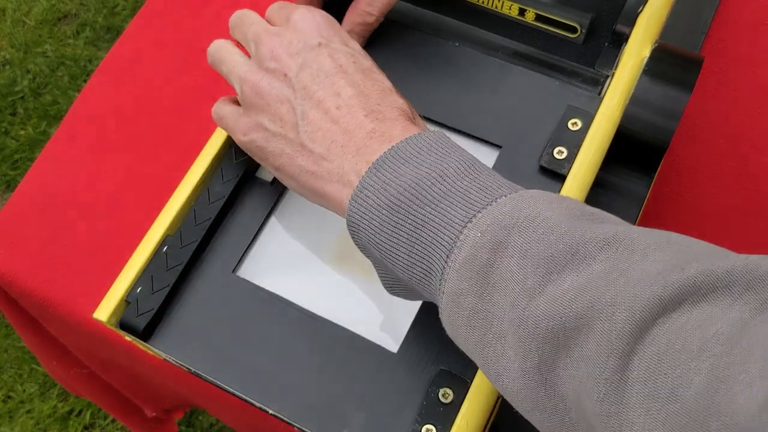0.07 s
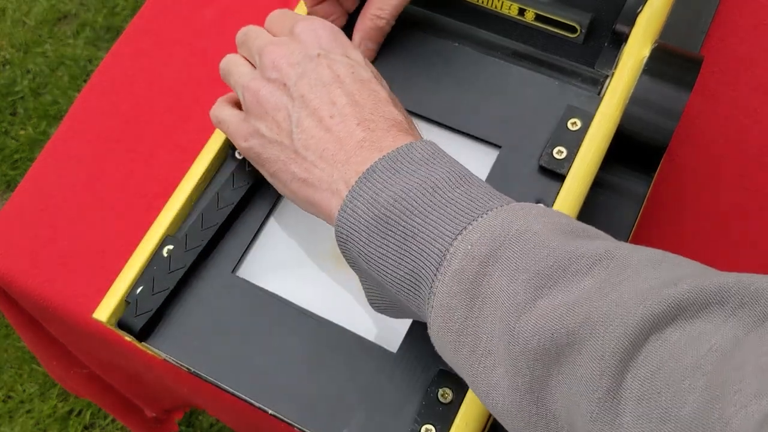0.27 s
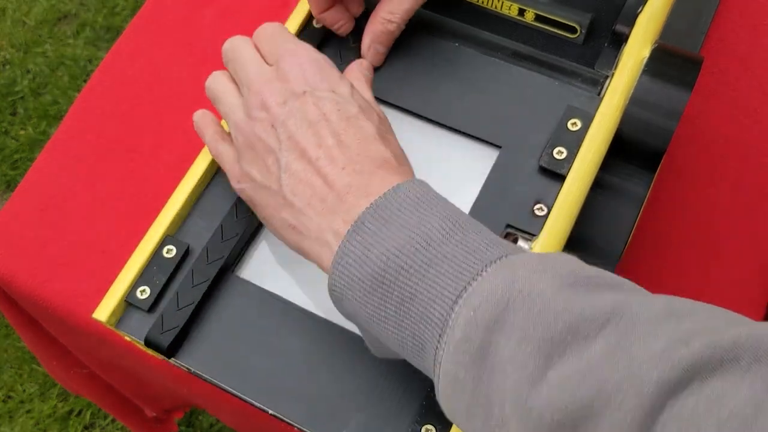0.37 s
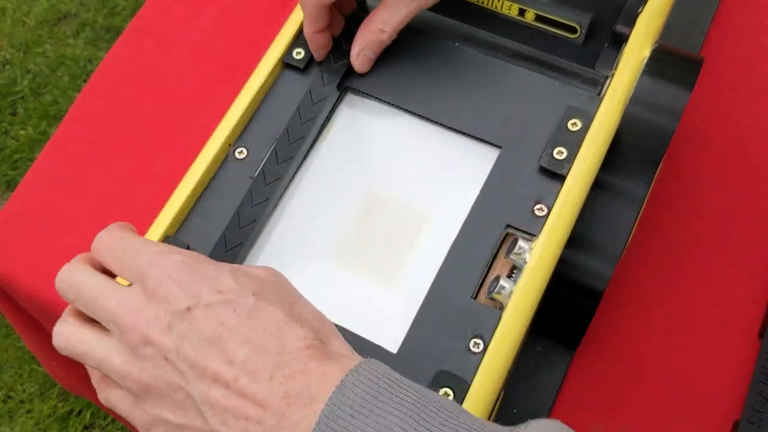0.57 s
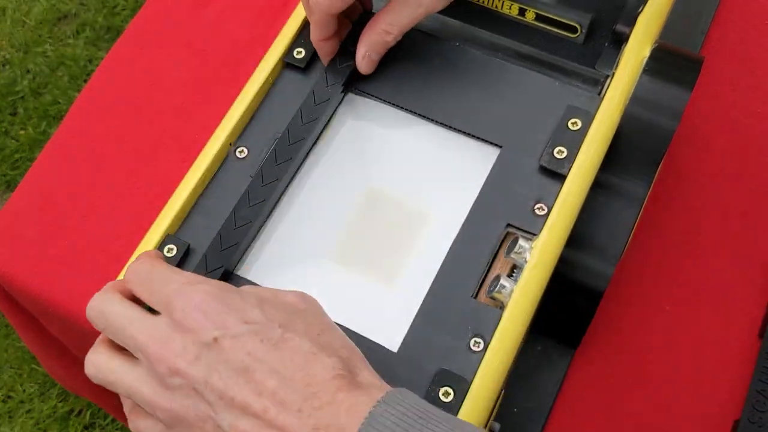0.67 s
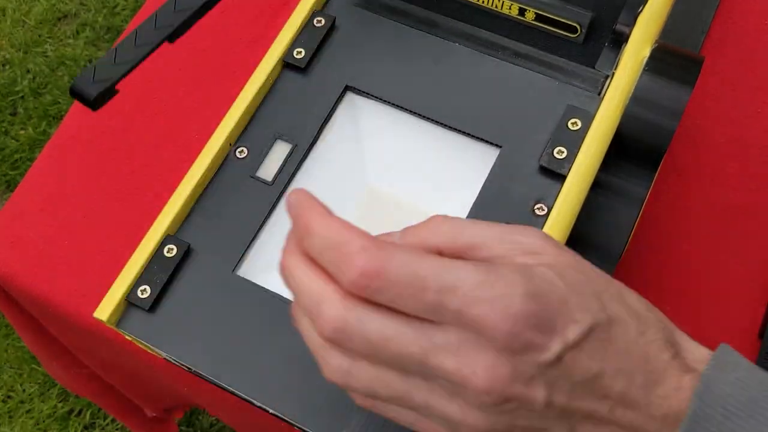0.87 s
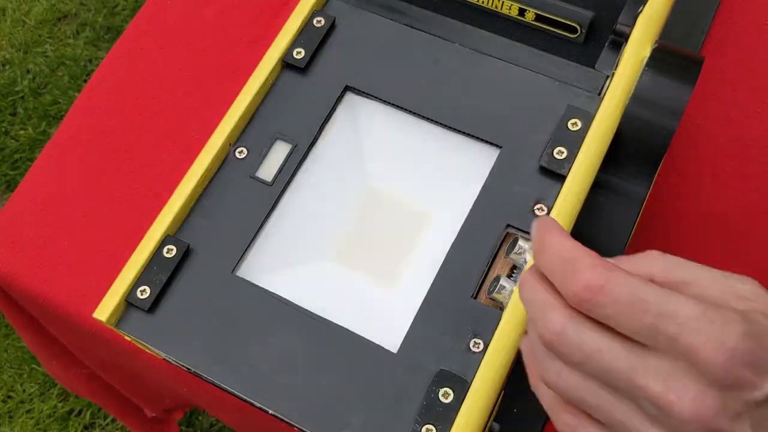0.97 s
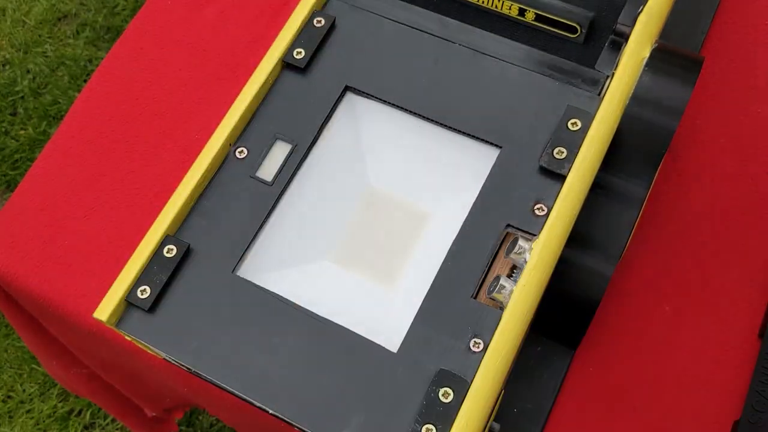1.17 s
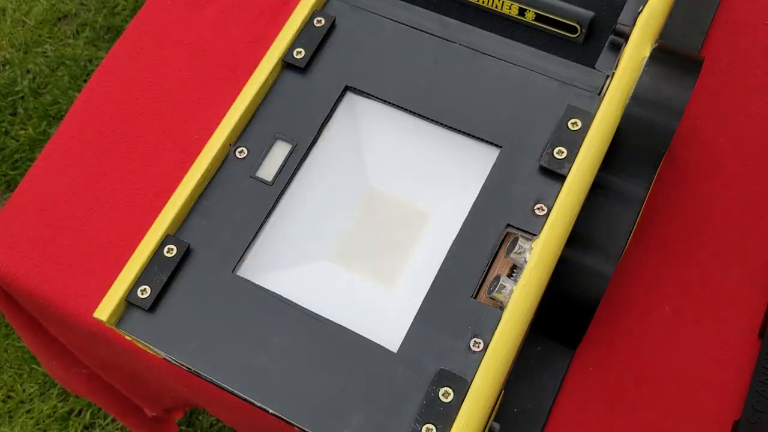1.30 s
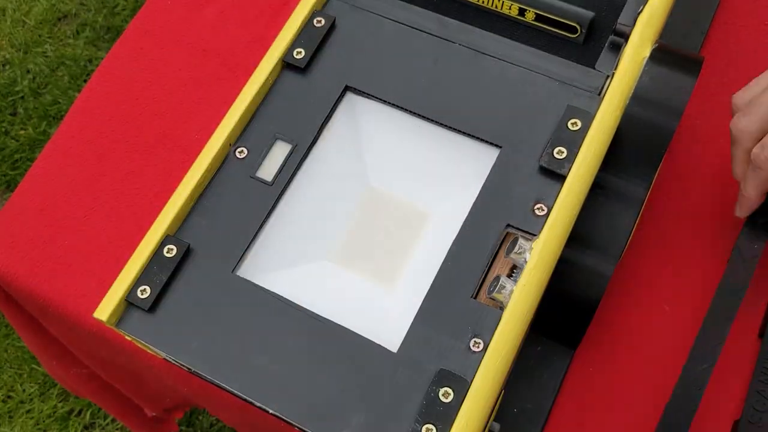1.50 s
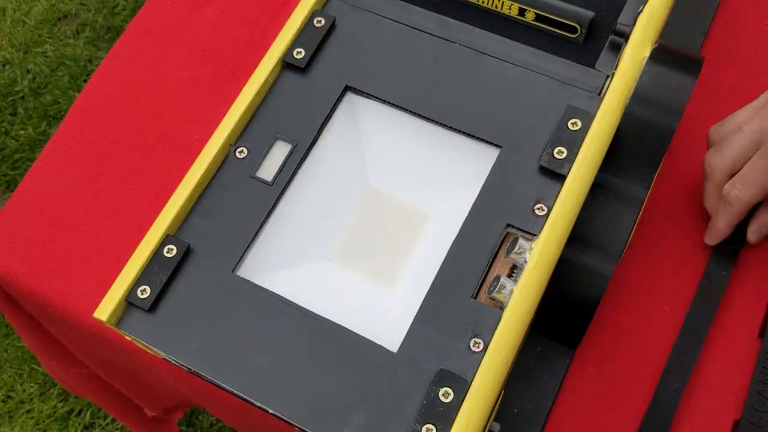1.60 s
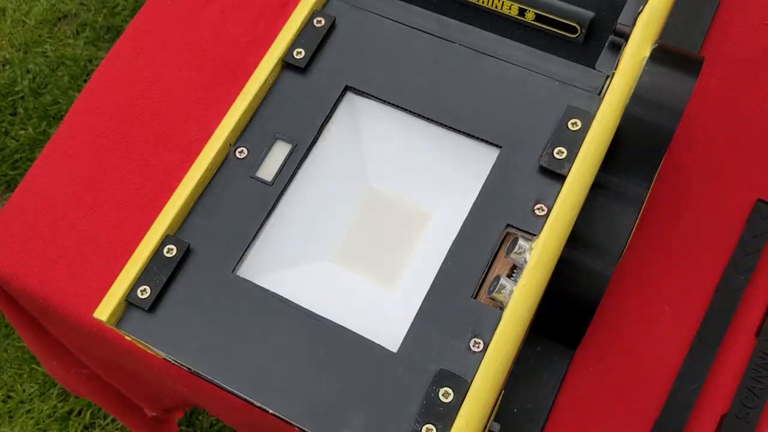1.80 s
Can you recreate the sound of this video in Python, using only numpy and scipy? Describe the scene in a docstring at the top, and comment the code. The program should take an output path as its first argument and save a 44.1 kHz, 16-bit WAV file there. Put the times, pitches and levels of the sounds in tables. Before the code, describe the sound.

A plastic strip snaps sharply off a hard panel, then scrapes and taps briefly.

```python
"""A low outdoor rumble, then close up and a little left, a hand pulls a plastic strip off a hard panel.
The catch creaks, slips a notch and snaps free, ringing the hollow panel. The loose strip scrapes
along its seat in tiny stick-slips and knocks against it. One faint, distant chirp follows,
and at the very end the rumble thins to a hiss."""
import sys
import numpy as np
from scipy import signal
from scipy.fft import rfft, irfft, next_fast_len
from scipy.io import wavfile

SR = 44100
rng = np.random.default_rng(int(sys.argv[2]) if len(sys.argv) > 2 else 0)


def wav_record(signal):
    """Record a signal, one row per channel, as 16-bit PCM in the file named by sys.argv[1]."""
    frames = np.transpose(np.atleast_2d(signal))
    bounded = np.clip(frames, -1, 1)
    # unit amplitude maps onto the largest positive 16-bit level
    quanta = np.round(bounded * 32767).astype(np.int16)
    wavfile.write(sys.argv[1], SR, quanta)


N = 81585

# colour of a light plastic tick: f/Hz, level/dB
TICK_COLOUR = [(150, -16.5), (500, 3), (1100, 10), (1800, 2), (3000, 2.5), (4500, -5), (6800, -8.5),
               (9500, -19.5), (16000, -21)]
# stereo image of the close noises: f/Hz, left-right likeness
NEAR_LIKENESS = [(300, 0.98), (700, .92), (1400, 0.38), (3000, 0.6), (7000, 0.22)]


def amp(db):
    """Decibels to gain."""
    return 10 ** (np.asarray(db) / 20)


def unit(x):
    """Scale to rms 1."""
    return x / np.sqrt(np.mean(x ** 2) + 1e-20)


def along(points, hz):
    """Read a breakpoint curve on a log frequency axis."""
    freqs, values = np.transpose(points)
    return np.interp(np.log(hz + 1), np.log(freqs + 1), values)


def since(start):
    """Seconds since start for every sample, zero before."""
    return np.maximum(np.arange(N) / SR - start, 0)


def dying(start, t60):
    """An envelope that jumps up at start and falls 60 dB in t60 seconds."""
    t = since(start)
    return (t > 0) * np.exp(-np.log(1000) * t / t60)


def filtered(x, response):
    """Pass x through a response given as a function of frequency."""
    size = 2 * next_fast_len(N)
    return irfft(rfft(x, size) * response(np.fft.rfftfreq(size, 1 / SR)), size)[..., :N]


def coloured(x, colour):
    """Minimum-phase EQ that keeps the power of white noise."""
    def response(hz):
        gain = unit(amp(along(colour, hz)))
        cepstrum = irfft(np.log(gain))
        cepstrum[1:len(cepstrum) // 2] *= 2
        cepstrum[len(cepstrum) // 2 + 1:] = 0
        return np.exp(rfft(cepstrum))
    return filtered(x, response)


def noise(likeness):
    """White stereo noise whose width follows a left-right likeness curve."""
    def mid_side_gains(hz):
        angle = np.arccos(np.clip(along(likeness, hz), -1, 1)) / 2
        return np.array([np.cos(angle), np.sin(angle)])
    mid, side = filtered(rng.standard_normal((2, N)), mid_side_gains)
    return np.array([mid + side, mid - side])


def waver(width_hz):
    """Slow noise of rms 1 that widens a tone into a narrow band."""
    return unit(filtered(rng.standard_normal(N), lambda hz: 1 / (1 + (hz / width_hz) ** 2)))


def air(rumble_db=-60.5, hiss_db=-62, fade_centre_s=1.745, fade_s=.078):
    """A steady bed of outdoor rumble crossfades into a thinner hiss."""
    # colours of the rumble and the hiss: f/Hz, level/dB
    rumble_colour = [(20, -50), (31, -29), (42, -10.5), (55, 2), (80, -3.5), (169, -8), (250, -10),
                     (480, -13.5), (945, -17.5), (1380, -23.5), (2560, -30), (6380, -32), (15500, -40.5)]
    hiss_colour = [(30, -32), (140, -33), (190, 4), (600, 2.5), (1500, -3), (4000, -8.5), (7000, -17),
                   (15000, -21.5)]
    # stereo image of the bed: f/Hz, left-right likeness
    likeness = [(60, 0.89), (240, 1), (950, 0.16), (3770, -0.22), (15000, 0.15)]
    rumble = amp(rumble_db) * unit(coloured(noise(likeness), rumble_colour))
    hiss = amp(hiss_db) * unit(coloured(noise(likeness), hiss_colour))
    fade = np.clip((np.arange(N) / SR - fade_centre_s) / fade_s + .5, 0, 1)
    return np.sqrt(1 - fade) * rumble + np.sqrt(fade) * hiss


def scrapes(attack_s=.004, release_s=.008, slips_per_s=4000, slip_spread_db=3, rasp_q=15):
    """Plastic slides on plastic: a hollow rub, a narrow rasp and the grit of dense, uneven slips."""
    # sliding strokes: t/s, length/s, rub level/dB, grit level/dB, rasp f/Hz, rasp level/dB
    strokes = [(0.057, 0.027, -68, -72, 10960, -70.5), (0.131, 0.018, -54.5, -70, 1470, -61.5),
               (0.242, 0.048, -43.5, -58, 1119, -55.5), (0.302, 0.061, -46, -55.5, 6700, -62),
               (0.362, 0.013, -50, -49, 5450, -53), (0.374, 0.013, -39.5, -54.5, 4480, -50),
               (0.4, 0.019, -57, -64.5, 1205, -66.5), (0.442, 0.028, -53.5, -58.5, 11300, -71.5),
               (0.471, 0.078, -55.5, -67.5, 6570, -69), (0.53, 0.055, -56.5, -86, 473, -49.5),
               (.610, 0.026, -52, -64, 6540, -58.5), (0.646, 0.037, -55.5, -66.5, 6300, -67),
               (0.697, 0.021, -55, -64.5, 525.8, -45), (0.699, 0.012, -67, -67, 3650, -54.5),
               (0.701, 0.036, -64, -68.5, 6150, -59)]
    # colours of the rub and the grit: f/Hz, level/dB
    rub_colour = [(100, -24), (215, -19), (280, -6), (390, -6), (500, 0), (640, -7), (760, -4), (920, -12),
                  (1120, -6), (1500, -20), (3000, -40)]
    grit_colour = [(600, -23.5), (1500, -2), (2000, 2), (2900, 7.5), (4400, -1.5), (6600, -5.5),
                   (7500, -5.5), (8700, -0.5), (9700, -10.5), (12000, -12), (16000, -17)]
    # resonances the sliding edge picks out of the grit: f/Hz, width/Hz, boost/dB
    edge_peaks = [(2315, 140, 5.5), (2871.6, 180, 4.5), (4420, 73, 8.5), (5273, 250, 7.5), (6970, 300, 10)]

    def edge_response(hz):
        peaks = sum((amp(db) - 1) * 1j * hz * width / (centre ** 2 - hz ** 2 + 1j * hz * width)
                    for centre, width, db in edge_peaks)
        return unit(1 + peaks)

    rub_envelope, grit_envelope, rasp = np.zeros((3, N))
    for start, length, rub_db, grit_db, rasp_hz, rasp_db in strokes:
        t = since(start)
        stroke = (1 - np.exp(-t / attack_s)) * np.exp(-since(start + length) / release_s)
        rub_envelope += amp(rub_db) * stroke
        grit_envelope += amp(grit_db) * stroke
        rasp += amp(rasp_db) * stroke * waver(rasp_hz / rasp_q) * np.sin(2 * np.pi * rasp_hz * t)
    slip_sizes = amp(slip_spread_db * np.minimum(rng.exponential(size=N), 3))
    slips = unit((rng.random(N) < slips_per_s / SR) * slip_sizes)
    rub = coloured(rub_envelope * unit(noise(NEAR_LIKENESS)), rub_colour)
    grit = coloured(grit_envelope * unit(slips * noise(NEAR_LIKENESS)), grit_colour)
    return rub + rasp + filtered(grit, edge_response)


def impacts(hits, modes, colour, attack_s, alternate=False, scatter_db=1.2):
    """Each hit rings the modes, duller if the contact is soft, and throws a short crunch of noise."""
    ring, crunch_power = np.zeros(N + SR), np.zeros(N)
    t = np.arange(SR // 4) / SR
    hz, mode_db, t60 = np.transpose(modes)[:, :, None]
    polarity = (-1) ** (alternate * np.arange(len(modes))[:, None])  # alternating signs slow the swell
    envelopes = np.exp(-np.log(1000) * t / t60) * (1 - np.exp(-t / attack_s))
    tones = polarity * np.sin(2 * np.pi * hz * t) * envelopes
    for start, ring_db, crunch_db, crunch_t60, hardness_hz in hits:
        level_db = ring_db + mode_db + scatter_db * rng.standard_normal(hz.shape)
        gain = amp(level_db) / np.hypot(1, hz / hardness_hz)
        ring[round(start * SR):][:len(t)] += (gain * tones).sum(axis=0)
        crunch_power += (amp(crunch_db) * dying(start, crunch_t60)) ** 2
    return ring[:N] + coloured(np.sqrt(crunch_power) * noise(NEAR_LIKENESS), colour)


def knocks():
    """The strip taps against its seat, each tap a tick with a short ring."""
    # taps: t/s, ring level/dB, tick level/dB, tick t60/s, hardness/Hz
    taps = [(.1353, -60.5, -53, .025, 2900), (.3312, -37.5, -32, .011, 4000), (.4425, -44.5, -52, .02, 693),
            (.5168, -51, -47, .02, 7060), (.5198, -34.5, -42.5, 0.042, 7050),
            (.5285, -56, -43, 0.021, 4000), (.5440, -47, -51.5, 0.069, 3000),
            (.5490, -39, -61, 0.018, 1190), (.6022, -47.5, -46.5, 0.013, 5000),
            (.6615, -50.5, -53, 0.019, 2000), (.6670, -50, -46, 0.0039, 5150),
            (.6865, -54, -43, 0.0028, 9170), (.6965, -44.5, -49.5, 0.032, 2000),
            (.9364, -62, -53.5, .015, 3976)]
    # modes of the strip: f/Hz, relative level/dB, t60/s
    strip_modes = [(290, -9, 0.17), (380, -12.5, 0.14), (451, -6.5, 0.078), (525.4, 4, 0.063),
                   (587, -3, 0.049), (722, -3.5, 0.051), (1084.6, -10.5, 0.068), (2550, -13, 0.057),
                   (6560, -6, 0.03)]
    return impacts(taps, strip_modes, TICK_COLOUR, attack_s=.0008)


def catch_slip():
    """The catch slips one notch and clicks while still held."""
    # the slip: t/s, ring level/dB, tick level/dB, tick t60/s, hardness/Hz
    notch = [(.1772, -33, -41, 0.019, 6004)]
    # modes of the held catch: f/Hz, relative level/dB, t60/s
    held_modes = [(299.6, -11, 0.055), (520, -3, .08), (730, -0.5, 0.059), (870, -4.5, .05),
                  (1820, -10.5, 0.033), (5200, -17, .025)]
    return impacts(notch, held_modes, TICK_COLOUR, attack_s=.00076)


def catch_snap():
    """The catch lets go in a tight cluster of cracks that ring the hollow panel."""
    # cracks: t/s, ring level/dB, crack level/dB, crack t60/s, hardness/Hz
    cracks = [(.2125, -39.5, -43.5, 0.021, 1200), (.2160, -26.5, -28.5, 0.048, 8066),
              (.2195, -34, -29.5, 0.068, 2967), (.2241, -20, -11.5, 0.012, 9000),
              (.2259, -28, -15.5, 0.01, 5000), (.2338, -36.5, -30, 0.0067, 1500)]
    # modes of the panel: f/Hz, relative level/dB, t60/s
    panel_modes = [(148, -24.5, 0.13), (284, -8.5, 0.15), (363, -11, .11), (405, -9.5, 0.15),
                   (545, -3, 0.092), (699, -11.5, 0.11), (776, 1, 0.14), (1018, -4, 0.047),
                   (1130, -4, 0.043), (1370, -3.5, 0.078), (2040, -8, .02), (2270, -8, 0.031),
                   (2940, 7.5, .02), (4260, -3.5, 0.018), (5700, -3, 0.0057), (6450, -7, .015),
                   (8300, -6.5, 0.028)]
    # bright colour of a crack: f/Hz, level/dB
    crack_colour = [(100, -16), (300, -17), (1200, -3), (1600, -5), (2050, 0.5), (2750, 7.5), (3600, -8),
                    (5800, -3), (7000, -18), (7900, -18.5), (8500, -4.5), (9700, -18.5), (13000, -20.5),
                    (16000, -35)]
    return impacts(cracks, panel_modes, crack_colour, attack_s=.00058, alternate=True)


def chirp(start_s=1.0, start_hz=2660, fall_hz_per_s=2100, level_db=-73, attack_s=.0062):
    """A faint falling note, perhaps a far bird, smeared by distance."""
    t = since(start_s)
    tone = np.sin(2 * np.pi * (start_hz - fall_hz_per_s * t / 2) * t)
    envelope = dying(start_s, t60=.8) * (1 - np.exp(-t / attack_s))
    return amp(level_db) * waver(width_hz=90) * tone * envelope


def panned_left(x, lead_s=.00019):
    """A close source reaches the left side earlier and brighter."""
    # balance: f/Hz, left minus right level/dB
    balance = [(300, -.3), (900, 0), (2400, 4), (5000, 7), (15000, 8)]
    half = np.array([[.5], [-.5]])
    return filtered(x, lambda hz: amp(along(balance, hz) * half) * np.exp(2j * np.pi * hz * lead_s * half))


def reflections(x, level_db=-19, predelay_s=.005):
    """Nearby surfaces scatter a short, weak tail to both sides."""
    # decay of the tail: f/Hz, t60/s
    decay_times = [(200, 0.6), (1000, .24), (4000, 0.28), (12000, 0.14)]
    hz, t, bands = signal.stft(noise(NEAR_LIKENESS)[:, :SR // 2], SR, nperseg=256)
    decay = np.exp(-np.log(1000) * t / along(decay_times, hz)[:, None])
    tail = signal.istft(bands * decay, SR, nperseg=256)[1]
    tail = np.pad(tail / np.linalg.norm(tail[0]), ((0, 0), (round(predelay_s * SR), 0)))
    return amp(level_db) * signal.fftconvolve(x, tail, axes=1)[:, :N]


def scene(low_cut_hz=99):
    """Close plastic and its reflections over the outdoor bed and the far chirp."""
    low_cut = signal.butter(2, low_cut_hz, "high", fs=SR, output="sos")  # small parts radiate little bass
    plastic = signal.sosfilt(low_cut, catch_slip() + catch_snap() + knocks() + scrapes())
    return panned_left(plastic) + reflections(plastic) + air() + chirp()


def record(dry, top_hz=15900):
    """A brick-wall low-pass trims the very top of the mix."""
    return filtered(dry, lambda hz: hz < top_hz)


dry = scene()
out = record(dry)
wav_record(out)
```